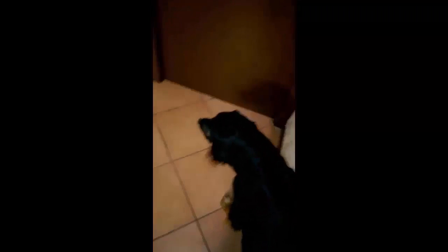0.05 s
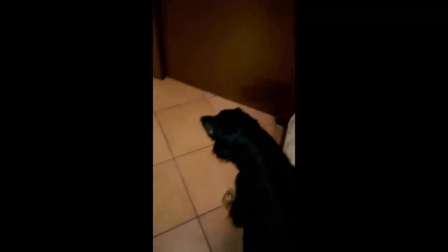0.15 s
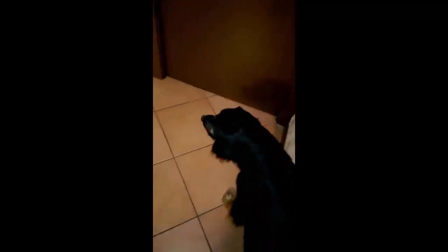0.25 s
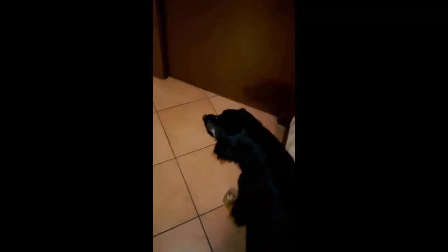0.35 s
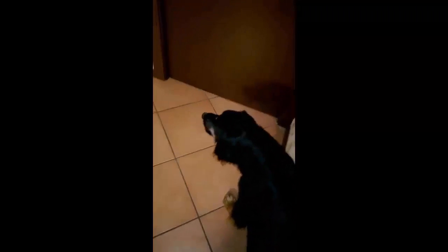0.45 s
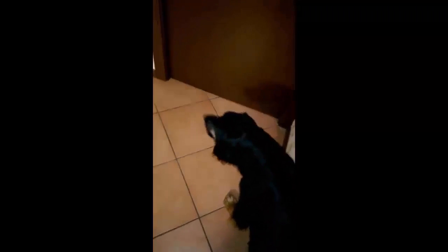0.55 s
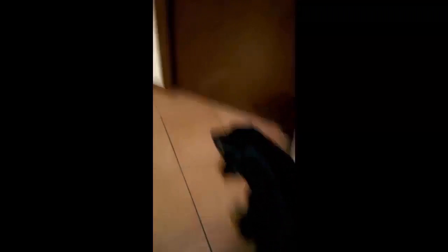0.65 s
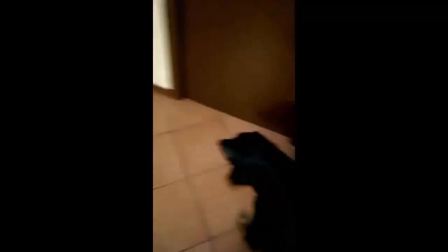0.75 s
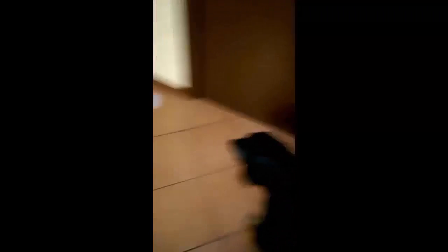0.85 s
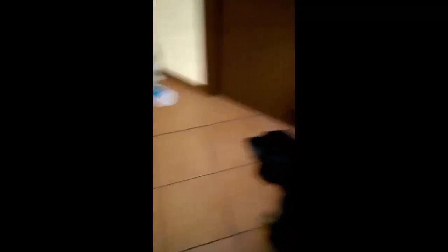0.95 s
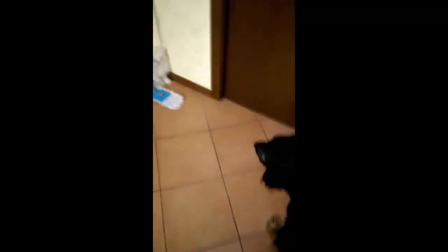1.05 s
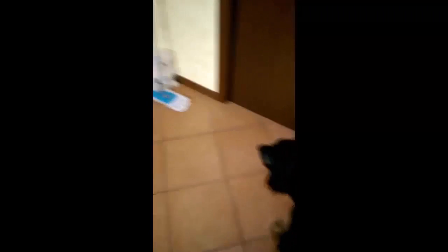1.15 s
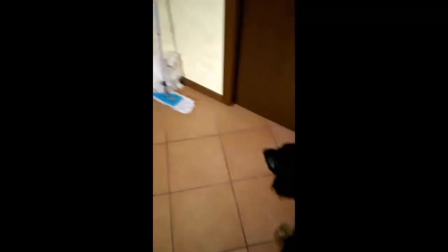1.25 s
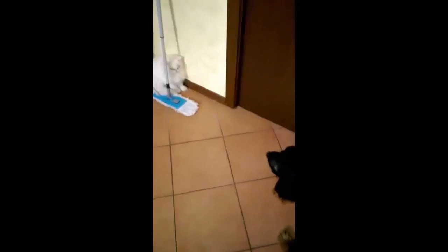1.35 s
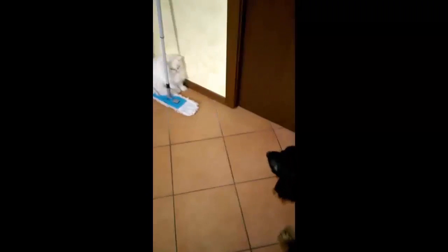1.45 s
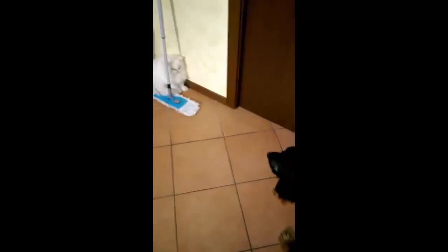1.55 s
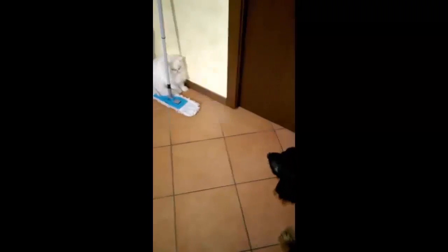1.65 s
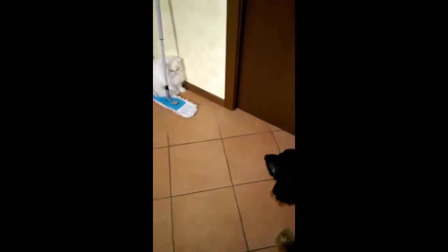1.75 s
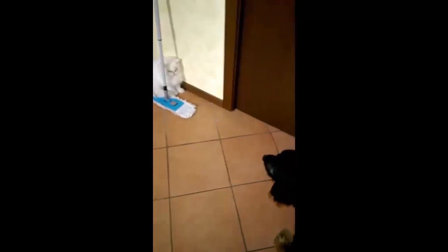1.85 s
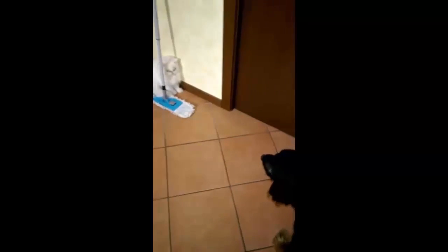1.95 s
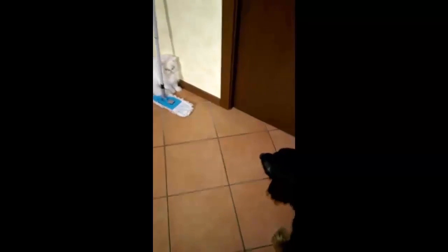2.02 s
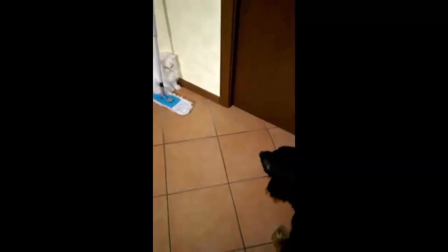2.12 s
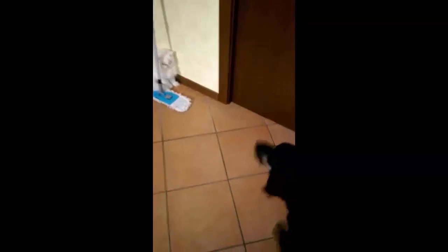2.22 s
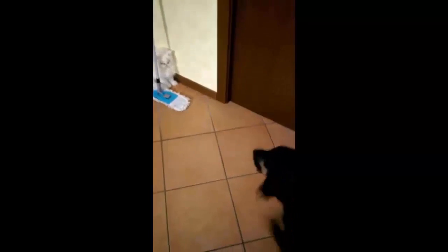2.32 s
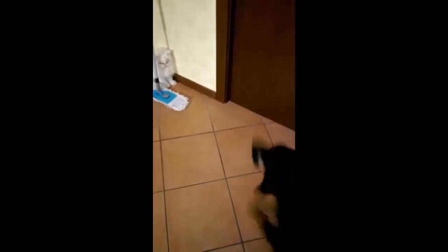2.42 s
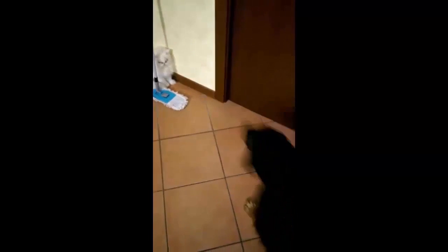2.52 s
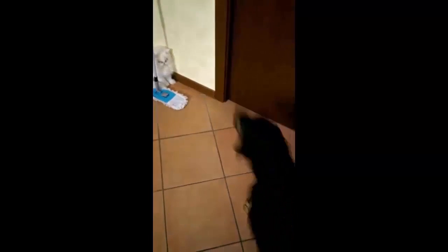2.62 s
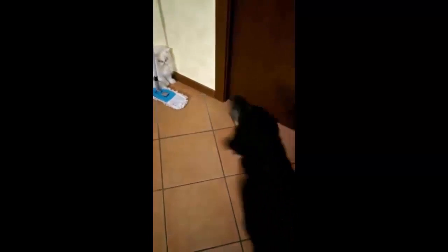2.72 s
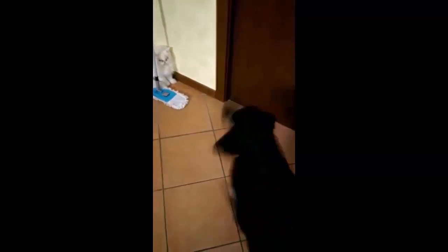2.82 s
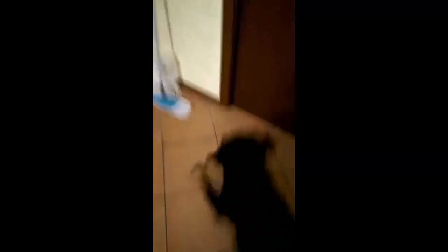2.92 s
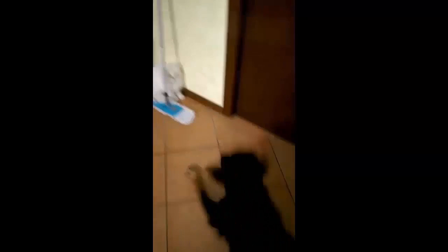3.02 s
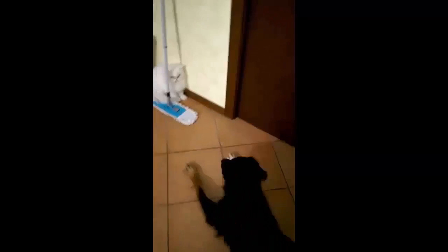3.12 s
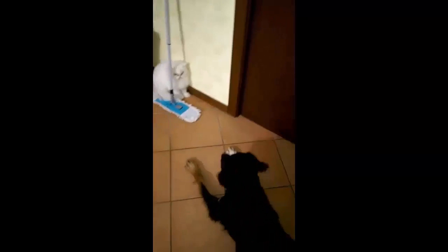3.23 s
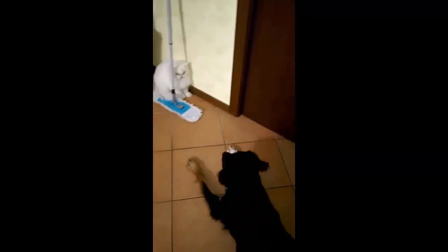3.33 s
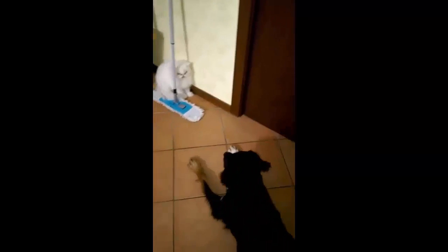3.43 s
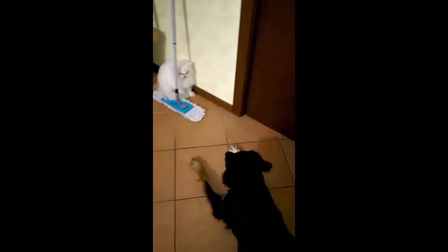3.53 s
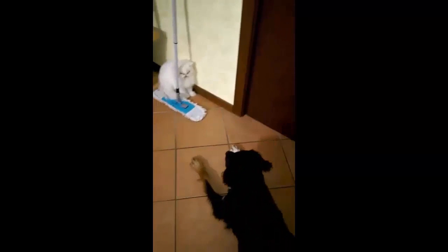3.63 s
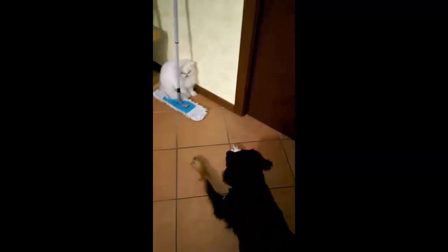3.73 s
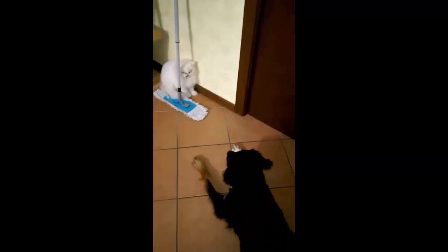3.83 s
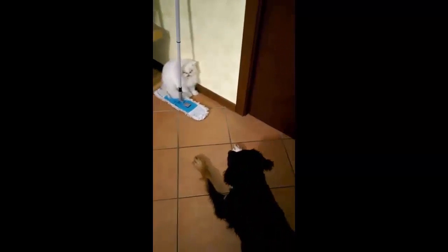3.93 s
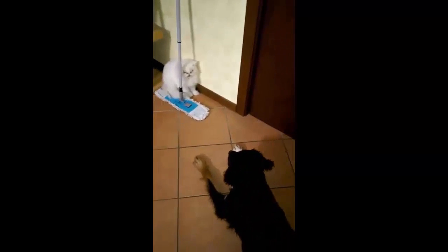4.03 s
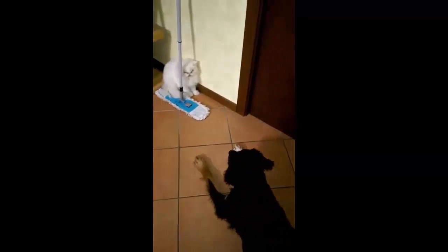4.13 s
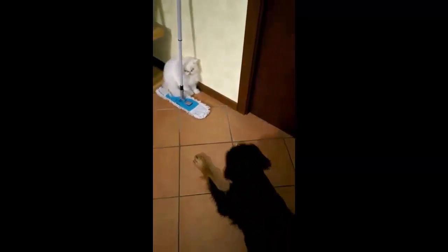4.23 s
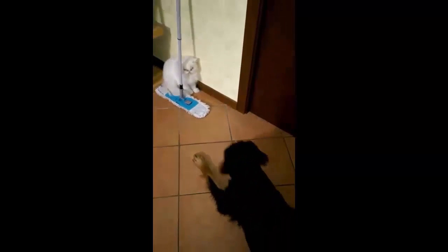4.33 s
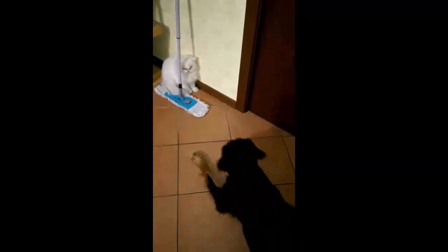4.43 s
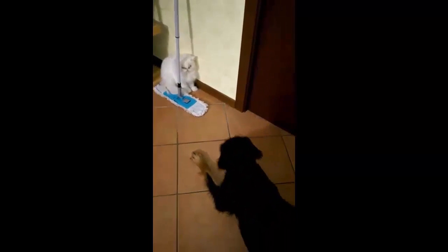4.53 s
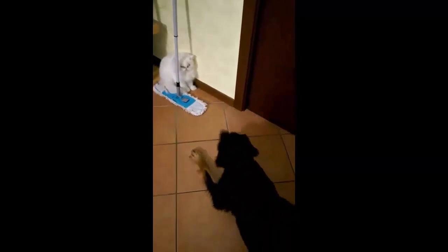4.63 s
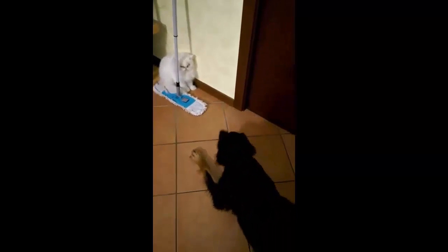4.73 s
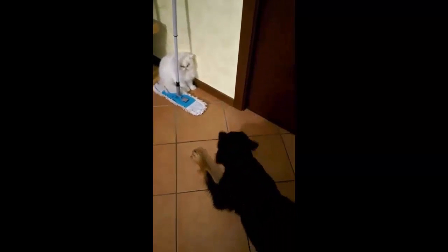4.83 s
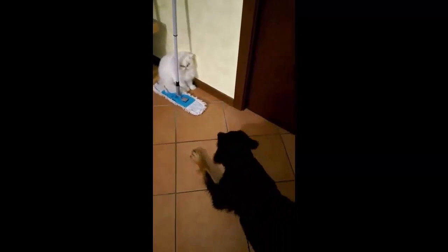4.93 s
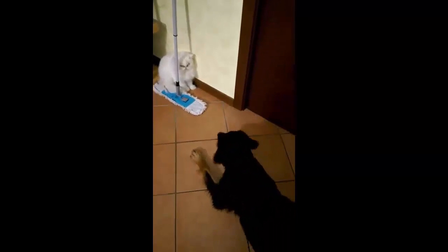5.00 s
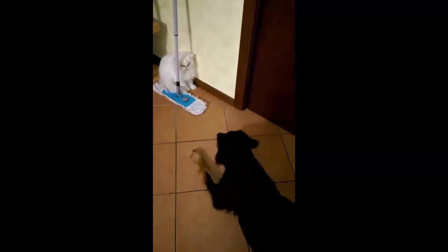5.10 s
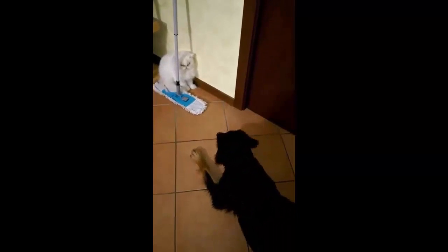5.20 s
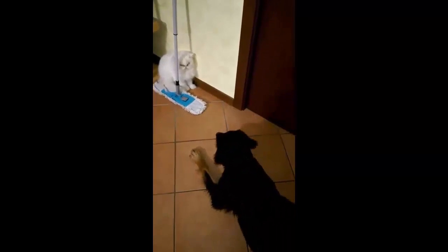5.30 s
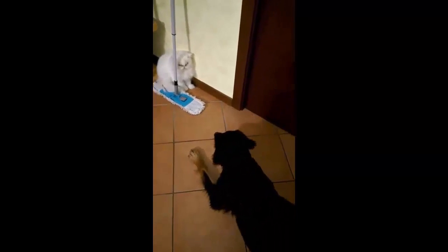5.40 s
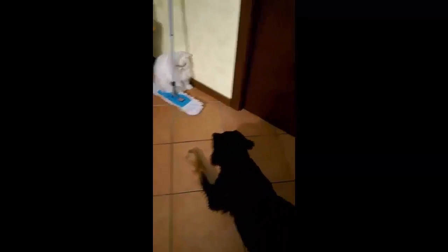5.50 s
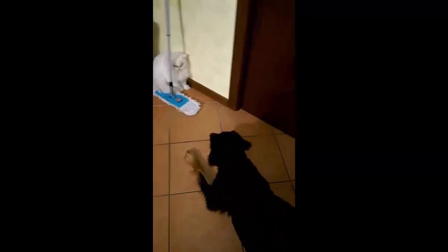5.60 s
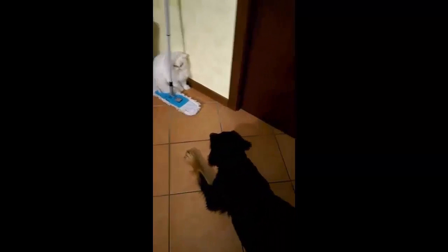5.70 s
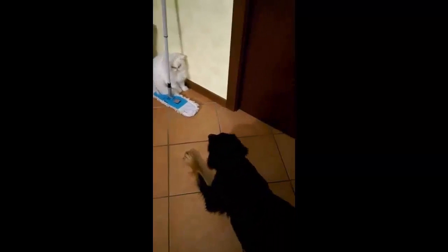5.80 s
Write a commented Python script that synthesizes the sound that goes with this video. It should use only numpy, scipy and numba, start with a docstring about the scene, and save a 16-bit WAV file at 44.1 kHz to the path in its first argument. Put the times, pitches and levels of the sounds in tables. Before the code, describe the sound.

A tiled hallway with hard, ringing walls, heard through a close handheld stereo microphone over quiet hush and faint hum. At the start an earlier bark is still dying away, and a soft thud lands at about 0.1 s. Around 0.4 to 0.7 s the dog gives a hoarse, rather muted woof with a little chest rattle. Small dull floor thuds follow near 0.9, 1.3 and, very faintly, 1.8 s. From 2.2 to 3.2 s come three loud, clearer barks linked on one breath, each opening sharply and sinking in pitch, their echoes hanging about half a second. Faint breathy hisses appear near 3.2 s, with weaker huffs afterwards. A soft double thud comes at 3.9 s, small puffs at 4.5 s, then the strongest low thud at 4.6 s. A last hoarse woof sounds at 4.7 to 4.9 s. From 5.3 s a very faint low growl continues, with a soft thud at 5.8 s.

```python
"""First a trace of an earlier bark dies away and a soft thud lands; then a large dog gives a hoarse woof.
Three linked barks follow, then a last woof and a low growl, in a tiled hallway with hard, ringing walls.
The voice is a vibrating tone plus noise and overtones shaped by mouth resonances. Thuds are decaying sines
and noise, hisses are puffs of filtered noise, and a quiet hush with a faint hum lies underneath."""
import sys
import numpy as np
from scipy import signal
from scipy.fft import rfft, irfft
from scipy.io import wavfile
from scipy.ndimage import uniform_filter1d
from numba import njit

SR = 44100
rng = np.random.default_rng(int(sys.argv[2]) if len(sys.argv) > 2 else 0)


def pcm_store(signal):
    """Save signal as 16-bit PCM."""
    levels = np.round(np.clip(np.atleast_2d(signal), -1, 1) * 32767)
    wavfile.write(sys.argv[1], SR, levels.astype(np.int16).T)


N = 258426
T = np.arange(N) / SR  # time in s

# Three linked barks on one breath: start_s, pitch_hz, effort_db
BARKS = [
    [(2.215, 372, -67), (2.242, 369.3, -37.5), (2.265, 391.2, -23), (2.295, 461.2, -13.5),
     (2.32, 482.4, -17.5), (2.355, 466, -17), (2.4, 442.8, -25), (2.47, 424.7, -19)],
    [(2.505, 437.2, -18.5), (2.53, 449, -22.5), (2.59, 430, -19), (2.62, 419.7, -20.5), (2.66, 408.7, -20),
     (2.71, 410.2, -19), (2.77, 398, -28)],
    [(2.805, 396.4, -21.5), (2.842, 445.2, -13), (2.885, 412, -22), (2.93, 394.8, -23),
     (3.01, 382.4, -20.5), (3.07, 390, -29), (3.14, 392, -29), (3.2, 390, -40)],
]
# Layers of the bark beside its tone: chest_db, mouth_db, rasp_db, breath_db, throat_puffs_db
BARK_MIX = (-48, -5, -24, -25, -20.5)
# Resonances of the nearly closed mouth: centre_hz, width_hz, level_db
BARK_MOUTH = [(585, 260, 3), (850, 260, 3), (1264.5, 770, -4), (1770, 570, -10)]
# Resonances of the rasp: centre_hz, width_hz, level_db
BARK_RASP = [(2300, 450, 0), (2700, 450, 0)]


def barks():
    """Fairly clear barks: the folds vibrate with little roughness."""
    return voice(BARKS, 0.21, BARK_MIX, BARK_MOUTH, BARK_RASP)


# Hoarse woofs: start_s, pitch_hz, effort_db
WOOFS = [
    [(.42, 436, -73.5), (.47, 433.8, -49.5), (.53, 451.7, -33), (.562, 450.7, -33), (.575, 327.7, -21.5),
     (.605, 333.9, -27), (.63, 428.1, -32), (.66, 395.8, -41.5), (.69, 390.8, -52)],
    [(4.67, 385.5, -44.5), (4.71, 385.5, -33), (4.745, 400.9, -22.5), (4.775, 390.5, -18.5),
     (4.825, 393, -21), (4.86, 377, -36.5), (4.885, 381, -29)],
]
# Layers of the woof beside its tone: chest_db, mouth_db, rasp_db, breath_db, throat_puffs_db
WOOF_MIX = (-27.5, -9, -24, -31, -3.5)
# Resonances of the nearly closed mouth: centre_hz, width_hz, level_db
WOOF_MOUTH = [(606, 120, 7), (1000, 310, -0.5), (1673, 120, -3), (2160, 550, -9.5)]
# Resonances of the rasp: centre_hz, width_hz, level_db
WOOF_RASP = [(2100, 300, -1), (2580, 150, 7), (2930, 150, 5)]


def woofs():
    """Hoarse woofs: rougher folds and stronger throat puffs."""
    return voice(WOOFS, 0.3, WOOF_MIX, WOOF_MOUTH, WOOF_RASP)


# The jaw snaps open in a bright burst:
# start_s, length_s, mouth_db, rasp_db, breath_db, main_resonance_start_hz, main_resonance_end_hz
OPENINGS = [(0.526, 0.022, -48.5, -36.5, -72.5, 1500, 1500), (0.586, 0.038, -38, -52.5, -54, 1500, 1500),
            (0.63, 0.012, -51.5, -36, -50, 1500, 1500), (2.256, 0.025, -18.5, -45, -31, 1480, 1540),
            (2.3, 0.015, -19, -41, -46.5, 1450, 1400), (2.508, 0.041, -17.5, -41.5, -34.5, 1480, 1320),
            (2.794, 0.024, -18, -53, -39.5, 1200, 1440), (4.736, 0.039, -29, -40, -37, 1500, 1500),
            (4.783, 0.035, -35, -41, -35, 1480, 1450)]
OPEN_ATTACK_S, OPEN_RELEASE_S = 0.016, 0.018
OPEN_NOISE = 1  # extra turbulence through the open jaw
# Resonances of the wide open mouth, the third is the main one: centre_hz, width_hz, level_db
OPEN_MOUTH = [(660, 460, -10.5), (1040, 500, -2), (1396, 140, 2.5), (1857, 360, -4.5)]
# Resonances of the breath before they move: centre_hz, width_hz, level_db
BREATH = [(4250, 600, -14), (5320, 700, 3), (5860, 340, -7.5), (6450, 580, 0), (7360, 860, -4.5),
          (10900, 7000, -24.5)]
# Path of the second breath resonance; all the others shift by the same ratio: time_s, centre_hz
BREATH_HZ = [(.55, 5020), (.66, 5400), (2.27, 4704), (2.33, 5356), (2.48, 5150), (2.525, 4750),
             (2.59, 5250), (2.66, 5150), (2.72, 4500), (2.8, 4500), (2.85, 5300), (3.1, 5155), (4.72, 5300),
             (4.78, 4940), (4.84, 5307)]
# Chest, mouth, rasp and breath rise FOLLOW dB per dB of effort; the mix levels hold at FULL_DB effort
FOLLOW, FULL_DB = 0.81, -20
HALF_S, HALF_LENGTH_S, HALF_DB = 2.56, 0.14, -42.5  # the folds briefly double their period


def voice(tables, rough, mix, mouth, rasp):
    """Vocal folds: strong fundamental, overtones through the mouth, chest rattle, breath gated each cycle."""
    s, *columns = np.concatenate(tables).T
    hz, db = (uniform_filter1d(np.interp(T, s, column), 441) for column in columns)
    layer_gains = [undb(FULL_DB + FOLLOW * (db - FULL_DB) + level) for level in mix[:4]]
    chest_gain, closed_gain, rasp_gain, breath_gain = layer_gains
    open_gain = 0
    for start, length, open_db, rasp_db, breath_db, _, _ in OPENINGS:
        shape = swell(start, length, OPEN_ATTACK_S, OPEN_RELEASE_S)
        open_gain = open_gain + undb(open_db) * shape
        rasp_gain = rasp_gain + undb(rasp_db) * shape
        breath_gain = breath_gain + undb(breath_db) * shape

    # jaw and lips are factors that shift the resonances
    start, length, *_, start_hz, end_hz = np.transpose(OPENINGS)
    jaw_times = np.ravel([start, start + length + OPEN_RELEASE_S], "F")
    jaw = np.interp(T, jaw_times, np.ravel([start_hz, end_hz], "F")) / OPEN_MOUTH[2][0]
    lips = np.interp(T, *np.transpose(BREATH_HZ)) / BREATH[1][0] * (1 + 0.038 * walk(25))

    # rows close in time belong to one breath
    sounding = sum((T >= a) & (T < b) for a, b in zip(s, s[1:]) if b - a < 0.5)
    on = uniform_filter1d(sounding * 1.0, 661)
    phase = 2 * np.pi * np.cumsum(hz * (1 + 0.15 * rough * walk(160))) / SR
    shimmer = undb(6 * rough * walk(120))
    gate = (1 + np.cos(phase)) / 2

    # hoarse folds leak puffs that ring the throat instead of a clean tone
    throat = unit(peak(rng.standard_normal(N), 280, 430))
    tone = np.sqrt(2 - 2 * rough) * np.sin(phase) * shimmer + undb(mix[4]) * throat
    buzz = sum(np.cos(k * phase) for k in range(2, 9)) * shimmer
    gated_noise = gate * rng.standard_normal(N)
    push = (1 - rough) * unit(buzz) + 8.0 * (rough + 0.06) * gated_noise
    air = (0.61 + gate) * rng.standard_normal(N)

    # the jaw opens wider on higher notes
    opening = (hz / hz[on > 0].mean()) ** 0.6
    half_shape = swell(HALF_S, HALF_LENGTH_S, RATTLE_ATTACK_S, RATTLE_RELEASE_S)
    half = undb(HALF_DB) * half_shape * np.sin(phase / 2)

    closed = closed_gain * tract(push, mouth, opening)
    wide = open_gain * tract(push + OPEN_NOISE * air, OPEN_MOUTH, jaw)
    rasping = rasp_gain * tract(push, rasp, np.ones(N))
    breath = breath_gain * undb(3.5 * walk(20)) * tract(air, BREATH, lips)
    return on * (undb(db) * tone + chest(chest_gain) + half + closed + wide + rasping + breath)


# The chest rattles, mostly before the mouth opens:
# start_s, length_s, level_db, start_pitch_hz, end_pitch_hz, overtones_db
RATTLES = [(0.423, 0.074, -46.5, 109.3, 126.7, -8.5), (0.526, 0.04, -33.5, 117, 129.8, -9.5),
           (0.585, 0.049, -30, 125.5, 124.2, -12), (2.22, 0.028, -31.5, 135.7, 120.4, -9),
           (2.435, 0.063, -31, 140.1, 119.4, -11.5), (2.68, 0.1, -32.5, 141.8, 122.6, -8),
           (2.956, 0.07, -43.5, 149.3, 104.8, -18), (4.675, 0.054, -31, 98.56, 129.9, -0.5),
           (4.743, 0.065, -40.5, 136.6, 164.3, 9.5)]
RATTLE_ATTACK_S, RATTLE_RELEASE_S = 0.028, 0.0075
# Overtones of the rattle: multiple, level_db
CHEST_ORDERS = [(2, 0.5), (3, -9.5), (4, -7), (5, -11)]


def chest(gain):
    """A slow second vibration deep in the throat, gliding through each rattle."""
    s, length, _, start_hz, end_hz, _ = np.transpose(RATTLES)
    hz = np.interp(T, np.ravel([s, s + length], "F"), np.ravel([start_hz, end_hz], "F"))
    low = 2 * np.pi * np.cumsum(hz * (1 + 0.03 * walk(40))) / SR
    overtones = sum(undb(db + 1.1 * walk(31)) * np.cos(k * low) for k, db in CHEST_ORDERS)
    out = gain * np.sin(low)
    for start, held, db, *_, over_db in RATTLES:
        shape = swell(start, held, RATTLE_ATTACK_S, RATTLE_RELEASE_S)
        out = out + undb(db) * shape * (np.sin(low) + undb(over_db) * overtones)
    return np.sqrt(2) * out * undb(4.7 * walk(35))


def tract(x, modes, opening):
    """Resonances, each applied twice, shifted together by the mouth opening."""
    total = 0
    for k, (hz, width, db) in enumerate(modes):
        once = glide(x, hz * opening, 1.0 * width)
        twice = glide(once, hz * opening, 1.0 * width)
        total = total + (-1) ** k * undb(db) * twice  # neighbours have opposite signs
    return unit(total)


@njit
def glide(x, hz, width):
    """State-variable band-pass with a moving centre."""
    y, band, low = np.empty(len(x)), 0., 0.
    for i in range(len(x)):
        g, k = np.tan(np.pi * hz[i] / SR), width / hz[i]
        v = (band + g * (x[i] - low)) / (1 + g * (g + k))
        band, low, y[i] = 2 * v - band, low + 2 * g * v, k * v
    return y


def swell(s, length, attack, release):
    """Envelope: smooth rise, hold until the length is up, exponential fall."""
    rise = np.clip((T - s) / attack, 0, 1) ** 2
    return rise * np.exp(-np.maximum(T - s - length, 0) / release)


# The low growl: start_s, pitch_hz, level_db
GROWL = [(5.299, 52.54, -85), (5.339, 56.3, -64), (5.41, 62, -59), (5.481, 64.95, -61),
         (5.62, 67.57, -61.5), (5.751, 66.4, -62.5)]
# Strength of each multiple of the growl's pitch: multiple, level_db
GROWL_ORDERS = [(1, -23.5), (2, 5.5), (3, -3), (4, 2), (5, -3), (6, -11.5), (7, -15), (8, -20)]


def growl():
    """Slow, nearly even fold pulses behind a closed mouth."""
    s, hz, db = np.transpose(GROWL)
    phase = 2 * np.pi * np.cumsum(np.interp(T, s, hz) * (1 + 0.012 * walk(60))) / SR
    stack = sum(undb(d + 1.5 * walk(30)) * np.cos(k * phase) for k, d in GROWL_ORDERS)
    return unit(stack) * undb(np.interp(T, s, db)) * (T > s[0])


# Soft thuds on the floor: start_s, level_db, slap_db (slap relative to the thud)
THUDS = [(0.061, -40, -21.5), (0.429, -47, -9.5), (0.866, -43, -30), (1.265, -49.5, -21),
         (1.292, -46.5, -18.5), (1.783, -58, -14), (3.922, -34.5, -25), (3.94, -36, -8), (4.566, -22, -11),
         (5.771, -42, -28)]
# Resonances of the floor: pitch_hz, level_db, time_to_fall_60_db_s
FLOOR_MODES = [(30.2, -23, .25), (58, -8, 0.3), (120, 2, 0.15), (169.6, 2, 0.14), (215, -10.5, 0.2),
               (321.2, -7.5, 0.18), (563, -14.5, 0.091)]
SLAP_RISE_S, SLAP_DECAY_S = 0.00051, 0.006


def thuds():
    """A soft push rings the floor; a brief slap rides on it."""
    size = 8820  # samples, 0.2 s
    out, t = np.zeros(N + size), T[:size]
    rise = 1 - np.exp(-t / 0.0017)
    body = ring(FLOOR_MODES, size=size) * rise
    slap_shape = (1 - np.exp(-t / SLAP_RISE_S)) * np.exp(-t / SLAP_DECAY_S)
    for s, db, slap_db in THUDS:
        grit = rng.standard_normal((2, size))
        rumble = unit(peak(grit[0], 160, 320)) * rise * np.exp(-t / 0.037)
        slap = unit(peak(grit[1], 700, 1500)) * slap_shape
        i = int(s * SR)
        out[i:i + size] += undb(db) * (body / np.abs(body).max() + 0.31 * rumble + undb(slap_db) * slap)
    return out[:N]


# Short hisses and huffs: middle_s, length_s, level_db, centre_hz, width_hz
HISSES = [(3.155, 0.095, -58.5, 10550, 6410), (3.172, 0.13, -53, 5000, 4900),
          (3.455, 0.11, -61.5, 1203, 1187), (3.734, 0.2, -73, 200, 122.7), (3.77, .26, -79.5, 4950, 704),
          (3.769, 0.48, -79.5, 6860, 683), (4.45, 0.029, -53.5, 6160, 3990),
          (4.537, 0.084, -65.5, 441, 516), (4.545, 0.065, -63.5, 5260, 5020),
          (4.668, 0.042, -59, 5900, 3820)]


def hisses():
    """Soft-edged puffs of noise, each filtered around one pitch region."""
    total = 0
    for s, length, db, hz, width in HISSES:
        puff = unit(peak(rng.standard_normal(N), hz, width))
        total = total + undb(db) * puff * np.exp(-((T - s) / length * 2) ** 4)
    return total


BANDS_HZ = 30 * 2 ** np.arange(0, 9.2, 0.5)  # half-octave band centres
# Ringing and direct sound of the hall: band_hz, time_to_fall_60_db_s, tail_db, direct_db
HALL = [(40.28, 0.76, -1.5, -3.5), (132.8, 0.81, -0.5, 4.5), (251, 0.61, -0.5, 3), (420, .6, 4.5, 1),
        (735, 0.61, 5, -7.5), (1820, 0.74, -3, -5), (2620, 0.6, -1.5, -2), (3600, 1, -1.5, -10),
        (5000, 0.6, 3.5, -3.5), (12000, 0.41, -8.5, -23)]
# Standing waves between the walls: pitch_hz, level_db, time_to_fall_60_db_s
HALL_MODES = [(82, -14, .4), (123, -20, 0.31), (259, -6.5, 0.22), (330, -12, 0.77), (386.5, -1.5, 0.28),
              (447.7, 1.5, 0.55), (688, -12, 0.59), (1520, -3.5, 0.62), (2590, -14.5, 0.38)]
EARLY_DB, EARLY_S = 15, 0.0067  # boost at the start of the tail and how fast it fades
PORT_LAG_S = 0.00028  # delay of the standing waves at the second microphone port


def hall(dry):
    """Direct sound, strong early echoes, a diffuse tail decaying band by band, standing waves between the walls."""
    size, tail = SR, 0
    for hz in BANDS_HZ:
        tail_db = on_log(HALL, hz, count=2) - 60 * T[:size] / on_log(HALL, hz)
        tail = tail + pair(size, hz) * undb(tail_db)
    tail = tail * (1 + undb(EARLY_DB) * np.exp(-T[:size] / EARLY_S))
    # the ports sit at different points of each standing wave
    waves = np.array([ring(HALL_MODES, size=size), ring(HALL_MODES, size=size, lag_s=PORT_LAG_S)])
    response = tail / np.sqrt(np.sum(tail ** 2) / 2) + undb(-54.0) * waves
    direct = colour(dry, lambda hz: on_log(HALL, hz, count=3))
    return direct + signal.fftconvolve(dry[None], response, axes=1)[:, :N]


# How alike left and right are: pitch_hz, correlation (1 = identical)
HALL_LIKENESS = [(60, 0.94), (150, 0.9), (350, 0.86), (700, 0.15), (2000, 0.013), (12000, 0.016)]


def pair(size, hz):
    """Half-octave noise for both ports, alike in the bass."""
    sos = signal.butter(2, [hz / 2 ** 0.25, hz * 2 ** 0.25], "band", fs=SR, output="sos")
    mid, side = signal.sosfilt(sos, rng.standard_normal((2, size)))
    c = np.clip(on_log(HALL_LIKENESS, hz), -0.9, 0.99)
    return np.sqrt((1 + c) / 2) * mid + np.sqrt((1 - c) / 2) * side * np.array([[1], [-1]])


# Colour of the room hush: pitch_hz, level_db (per Hz)
QUIET = [(15, -32), (25, -1.5), (53, -20), (109, 2), (154, -10), (212, -11), (652, -13), (726, -20),
         (786, -18), (2170, -15), (5250, -19.5), (9700, -27.5), (14900, -29.5)]
QUIET_DB = -68.5  # overall level of the hush
# Faint steady tones: pitch_hz, level_db
HUM = [(100, -84), (129, -89.5), (194, -82.5), (727, -87)]
# Colour of an earlier bark that still rings out: pitch_hz, level_db (per Hz)
RINGING = [(35, -39), (60, -4), (271, -2.5), (361, 7), (482, -11.5), (703, 0.5), (768, -11.5), (917, 4),
           (1050, -15.5), (1350, -22), (1500, -5.5), (1650, -21), (2400, -26.5), (2600, -13), (2840, -40.5),
           (4520, -31), (12000, -71), (15600, -104), (22000, -120)]
RINGING_DB = -45  # its level over the first 0.03 s


def background():
    """Room hush that flickers band by band, faint hum, and the fading earlier bark."""
    hush, fading = 0, 0
    for hz in BANDS_HZ:
        noise = pair(N, hz)
        hush = hush + undb(on_log(QUIET, hz) + (2.5 + 150 / hz) * walk(13)) * noise
        fading = fading + undb(-60 * T / on_log(HALL, hz)) * noise
    hum = sum(undb(db + 1.0 * walk(2.9)) * np.sqrt(2) * np.sin(2 * np.pi * hz * T) for hz, db in HUM)
    fading = colour(fading, lambda hz: on_log(RINGING, hz))
    start = np.sqrt(np.mean(fading[:, :1323] ** 2))
    return undb(QUIET_DB) * unit(hush) + hum + undb(RINGING_DB) * fading / start


def undb(db):
    """Turn decibels into a plain multiplier."""
    return 10 ** (np.asarray(db) / 20)


def unit(x):
    """Scale to an average (rms) level of 1."""
    return x / np.sqrt(np.mean(x ** 2))


def on_log(table, hz, count=1):
    """Read one column of a (Hz, value, ..) table on a log axis."""
    rows = np.transpose(table)
    return np.interp(np.log(np.maximum(hz, 1)), np.log(rows[0]), rows[count])


def colour(x, db_of_hz):
    """Weight the spectrum."""
    size = x.shape[-1]
    return irfft(rfft(x) * undb(db_of_hz(np.fft.rfftfreq(size, 1 / SR))), size)


def peak(x, hz, width):
    """Resonance applied twice: steep skirts."""
    b, a = signal.iirpeak(hz, hz / width, SR)
    return signal.lfilter(b, a, signal.lfilter(b, a, x))


def ring(modes, size, lag_s=0.):
    """Decaying sines of a mode table."""
    t = T[:size]
    return sum(undb(db - 60 * t / t60) * np.sin(2 * np.pi * hz * (t - lag_s)) for hz, db, t60 in modes)


def walk(rate):
    """Smooth random wander around zero, rms 1, with about `rate` new values a second."""
    k = int(SR / rate)
    steps = np.repeat(rng.standard_normal(N // k + 1), k)
    return unit(uniform_filter1d(uniform_filter1d(steps, k), k)[:N])


def scene():
    """The dog, the thuds and the hisses sound in the hall, over the background."""
    near = undb(-3.5) * (barks() + woofs()) + growl() + thuds() + hisses()
    return hall(near) + background()


# Colour difference of the two microphone ports: pitch_hz, left_minus_right_db
PORTS = [(60, -3.5), (110, -1), (200, 2.5), (370, 2), (690, 2), (1260, 1.5), (2320, 3.5), (4270, 4.5),
         (7850, -4.5), (14400, -1.5)]
TOP_HZ = 14800  # upper limit of the sound


def record(dry):
    """The two ports differ in colour; loud peaks are rounded and the top is cut."""
    left = colour(dry[0], lambda hz: on_log(PORTS, hz) / 2)
    right = colour(dry[1], lambda hz: -on_log(PORTS, hz) / 2)
    rounded = np.tanh(1.2 * np.array([left, right])) / 1.2
    return signal.sosfilt(signal.ellip(8, 0.2, 70, TOP_HZ, fs=SR, output="sos"), rounded)


dry = scene()
out = record(dry)
pcm_store(out)
```